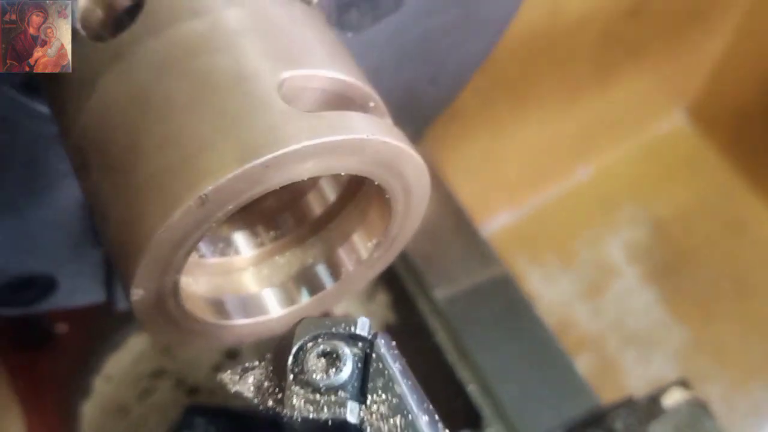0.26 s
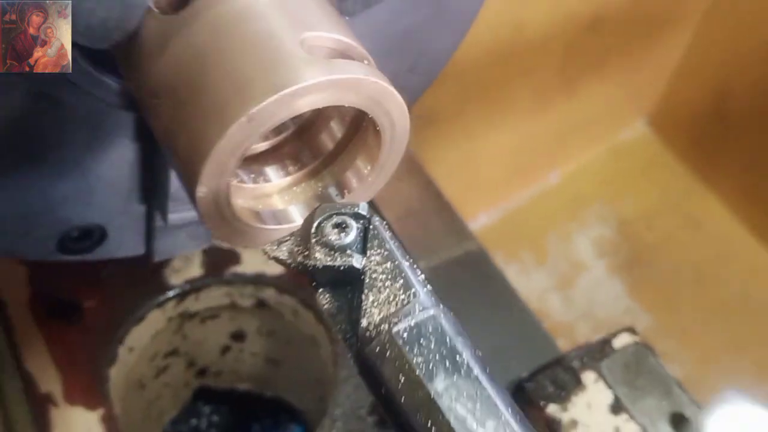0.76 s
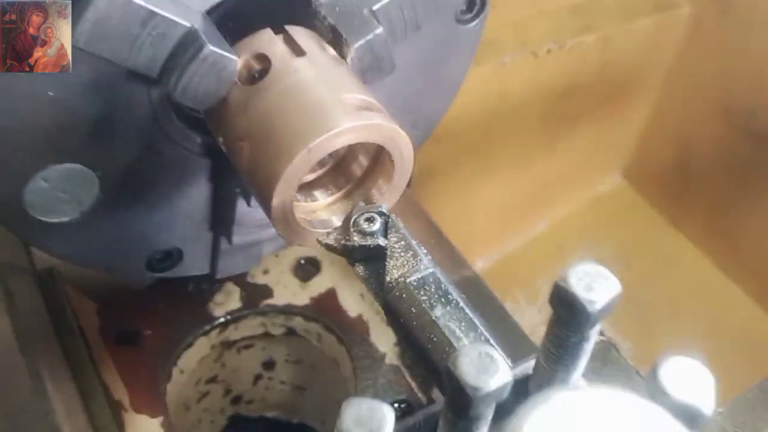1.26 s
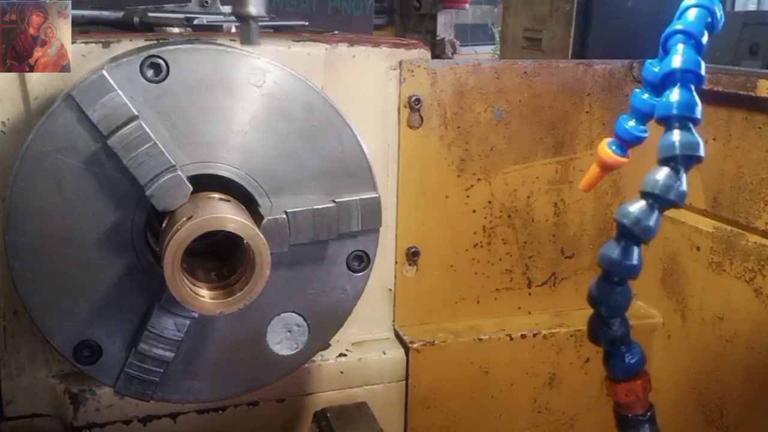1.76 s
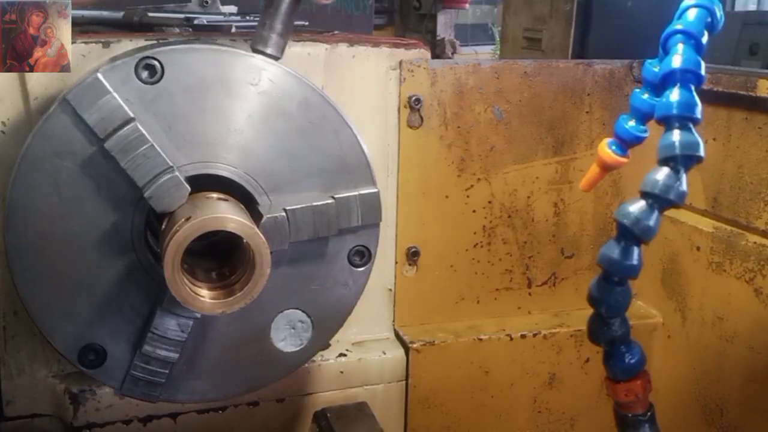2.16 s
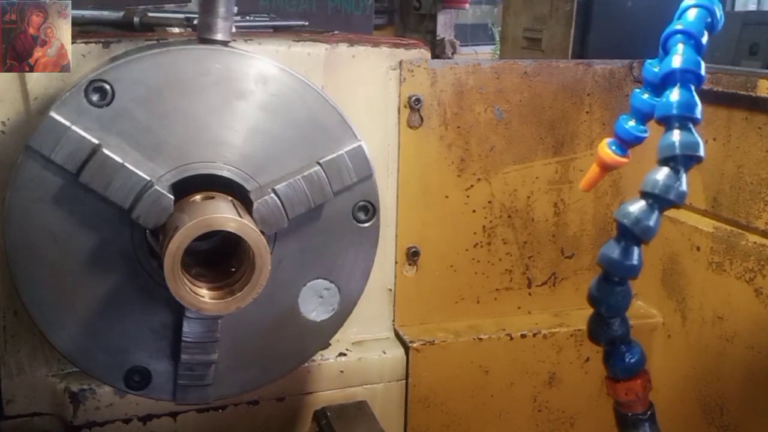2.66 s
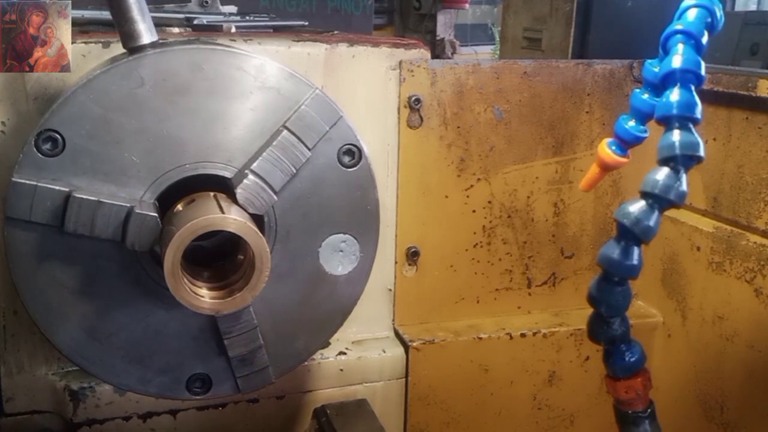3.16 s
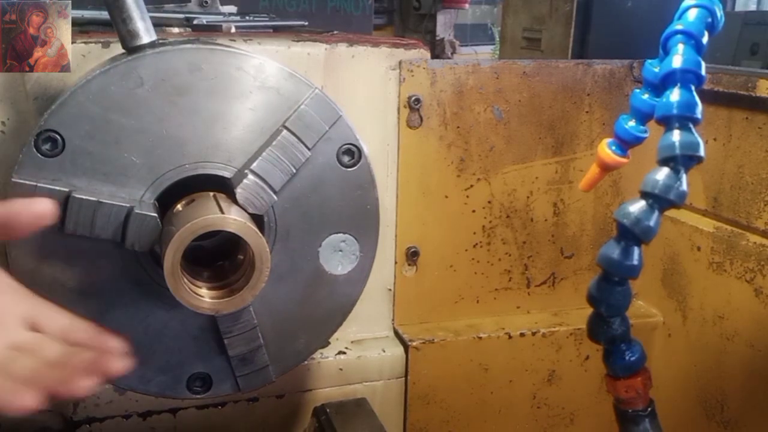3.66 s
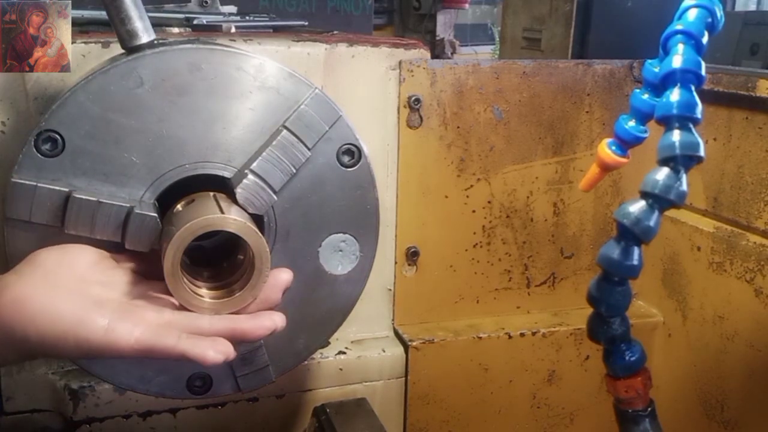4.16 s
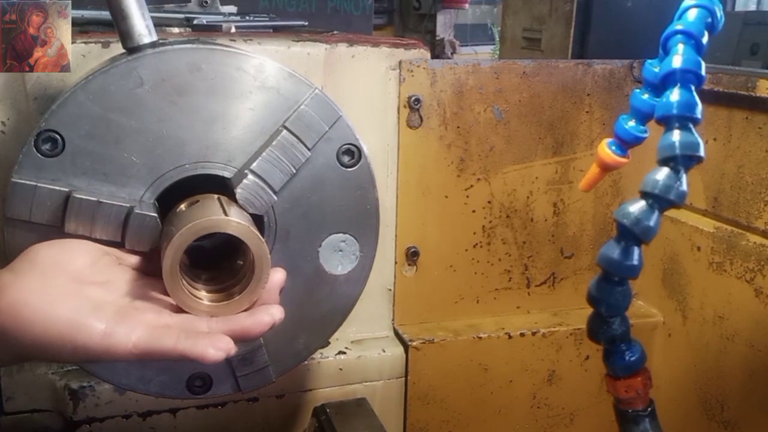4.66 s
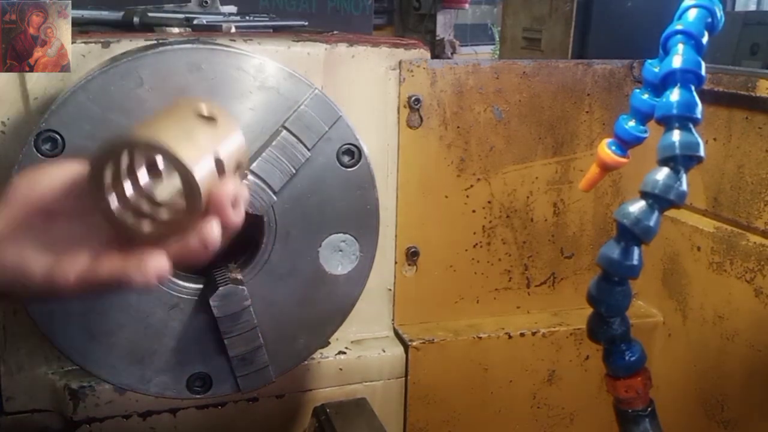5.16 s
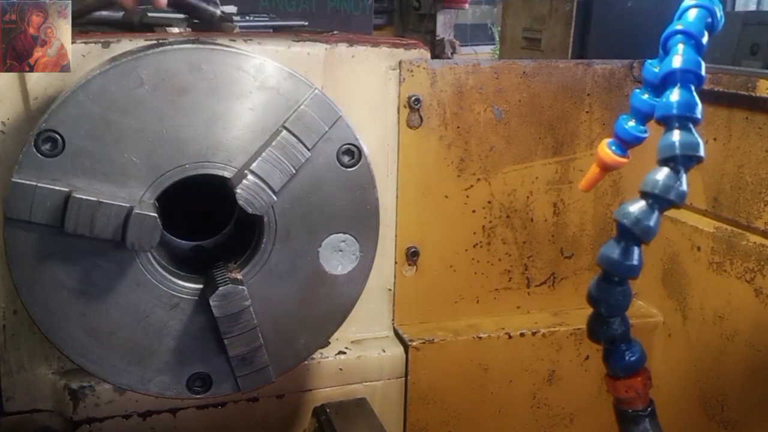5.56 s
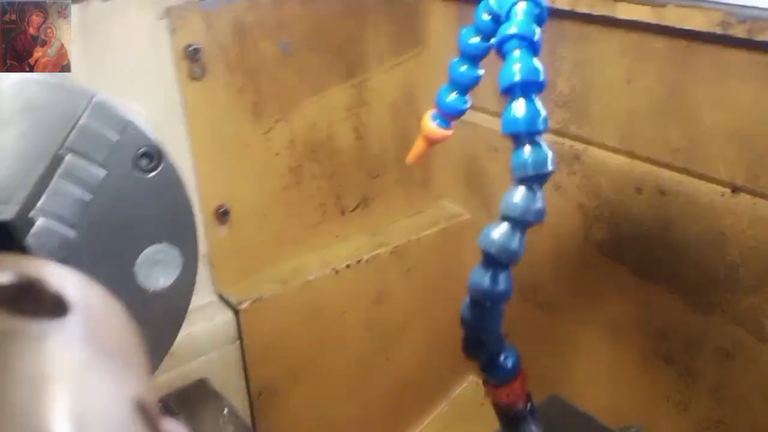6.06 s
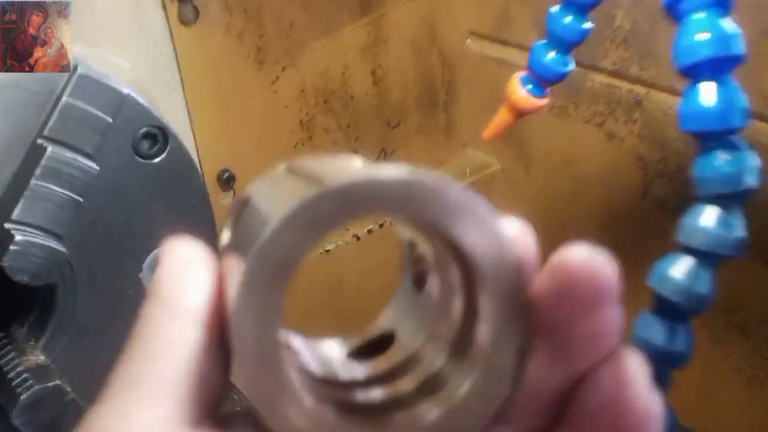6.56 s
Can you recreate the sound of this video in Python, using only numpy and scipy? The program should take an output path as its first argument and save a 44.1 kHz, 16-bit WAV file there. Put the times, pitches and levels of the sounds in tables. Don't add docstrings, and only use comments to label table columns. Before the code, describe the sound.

Sharp steel clicks and a dropped, rattling key in an idle lathe shop, with echoing bird whistles, hissing insects and low far-off rumble.

```python
import sys
import numpy as np
from scipy import signal
from scipy.io import wavfile
from scipy.ndimage import uniform_filter1d

SR = 44100
rng = np.random.default_rng(int(sys.argv[2]) if len(sys.argv) > 2 else 0)


def invert_db(level):
    return 10 ** (np.asarray(level, dtype=float) / 20)


def store_pcm(level_fs):
    pcm = np.round(np.clip(level_fs, -1, 1) * 32767).astype(np.int16)
    wavfile.write(sys.argv[1], SR, np.atleast_2d(pcm).T)


N = 300309


def evened(x):
    return x / np.sqrt(np.mean(x ** 2) + 1e-20)


def read(points, hz):
    f, value = np.transpose(points)
    return np.interp(np.log(hz + 1), np.log(f + 1), value)


def sides(db):
    return invert_db(np.array([[db / 2], [-db / 2]]))


def add(mix, s, sound):
    part = mix[..., round(s * SR):][..., :sound.shape[-1]]
    part += sound[..., :part.shape[-1]]


SPLICES = [
    0,
    1.5,
    3.607,
    5.826,
    7,
]


def by_shot(values, s):
    return np.take(values, np.searchsorted(SPLICES, s + .01) - 1)


def to_shot(s, sound):
    end = SPLICES[np.searchsorted(SPLICES, s + .02)]
    left_s = end - s - np.arange(sound.shape[1]) / SR
    return sound * np.clip(left_s / 0.0035, 0, 1)


# pitch_hz, left_over_right_db
LEAN = [(60, -1.5), (110, 0), (200, 2), (380, -4), (700, 1.5), (1290, 1.5), (2380, 4.5), (4400, 5),
        (8120, -19.5), (15000, 10)]


def noise(shape, size, patchy_db, same):
    frames, hz = 4 * N // size + 5, np.fft.rfftfreq(size, 1 / SR)
    a, b, c, d, patches = rng.standard_normal((frames, len(hz), 5)).T
    patches = uniform_filter1d(patches, size=8, axis=0)
    patches = evened(uniform_filter1d(patches, size=10, axis=1))
    like = np.clip(read(same, hz), -1, 1)[:, None]
    left = a + 1j * b
    right = like * left + np.sqrt(1 - like ** 2) * (c + 1j * d)
    z = np.array([left, right])
    z *= invert_db(read(shape, hz)[:, None] + patchy_db * patches)
    z[0] *= invert_db(read(LEAN, hz))[:, None]
    return evened(signal.istft(z, nperseg=size, noverlap=3 * size // 4)[1][:, :N])


def tail(decays, start_s, hold_s, lumpy_db):
    taps = np.zeros((2, 25000))
    slots = np.arange(round(start_s * SR), taps.shape[1] - 20, 20)
    at = slots + rng.integers(0, 20, (2, len(slots)))
    np.put_along_axis(taps, at, rng.choice([-1., 1.], at.shape), 1)
    lumps = evened(uniform_filter1d(rng.standard_normal(taps.shape[1]), size=250))
    taps *= invert_db(lumpy_db * lumps)
    hz, t, z = signal.stft(taps, SR, nperseg=256)
    fade_db = -60 * np.maximum(t - hold_s, 0) / read(decays, hz)[:, None]
    out = signal.istft(z * invert_db(fade_db), SR, nperseg=256)[1]
    return out / np.linalg.norm(out[0])


def ring(hz, db, t60, apart, rough):
    t = np.arange(int(np.clip(t60.max() * SR, 3000, SR // 2))) / SR
    start, throb, when = rng.random((3, len(hz), 1))
    phase = 2 * np.pi * start + apart * rng.standard_normal((2, len(hz), 1))
    beat = (15 + 50 * throb) * t + when + 0.37 * np.sin(45 * t + 6 * start)
    size = invert_db(db[:, None] - 60 * t / t60[:, None]) * (1 + rough * np.sin(2 * np.pi * beat))
    return (size * np.sin(2 * np.pi * hz[:, None] * t + phase)).sum(1)


def causal(gain_db):
    log_gain = np.log(invert_db(np.maximum(gain_db, -70)))
    full = np.concatenate([log_gain, log_gain[-2:0:-1]])
    taps = np.fft.ifft(np.exp(np.conj(signal.hilbert(full)))).real[:256]
    return taps / np.linalg.norm(taps)


# pitch_hz, level_db per Hz
BUSY = [(150, -4.5), (250, -1), (1240, -9.5), (2300, -7.5), (3500, -17.5), (4850, -5.5), (4980, -19),
        (6700, -10.5), (7840, 8), (9660, -16), (10300, -28.5), (12500, -34), (14700, -33.5), (16000, -51)]
QUIET = [(150, -8.5), (250, -4), (342, -9), (802, -11), (1160, -18), (1420, -15.5), (1980, -19),
         (4490, -22.5), (4990, -23.5), (6250, -22), (7700, 0.5), (9660, -10.5), (10700, -26.5),
         (13700, -25), (16000, -33.5)]
# pitch_hz, likeness (0 to 1)
SAME = [(60, 0.71), (180, 1), (550, 0.27), (1650, 0.01), (4970, 0.01), (15000, 0.01)]
# time_s, level_db
SWELL = [(0, 1.4), (.3, 1.5), (.7, 1), (1.05, 2), (1.25, 2.5), (1.4, 1.5), (1.5, 4)]
# level_db, then left_over_right_db
AIR_BY_SHOT_DB = [-0.17, -1.97, -2.5, 1.5]
LEAN_BY_SHOT_DB = [2.5, -1.3, -1.5, -1.7]


def air():
    t = np.arange(N) / SR
    shot = np.searchsorted(SPLICES, t, "right") - 1
    swell_db = np.interp(t, *np.transpose(SWELL))
    busy = invert_db(-48.5 + swell_db) * noise(BUSY, size=1024, patchy_db=2.5, same=SAME)
    quiet = invert_db(-54.5) * noise(QUIET, size=1024, patchy_db=2.5, same=SAME)
    lean = invert_db(np.take(LEAN_BY_SHOT_DB, shot) * np.array([[.5], [-.5]]))
    return np.where(shot == 0, busy, quiet) * invert_db(np.take(AIR_BY_SHOT_DB, shot)) * lean


# centre_hz, width_hz, pulses_per_s, level_db
INSECTS = (7726, 708, 44.5, -70)


def insects():
    hz, width_hz, rate, db = INSECTS
    drift = evened(uniform_filter1d(rng.standard_normal(N), size=9000))
    pulse_part = np.cumsum(rate * (1 + 0.0092 * drift)) / SR % 1
    gate = np.exp(-pulse_part / 0.92)
    edges_hz = [hz - width_hz / 2, hz + width_hz / 2]
    band = signal.butter(2, edges_hz, "bandpass", fs=SR, output="sos")
    rasp = evened(signal.sosfilt(band, gate * rng.standard_normal(N)))
    return invert_db(db) * sides(-24.5) * rasp


# pitch_hz, level_db per Hz
DEEP = [(30, -17), (46, -17), (59, 20), (76, 29), (102, -31), (140, -62), (240, -120)]
BOOM = [(50, -35), (85, -30), (108, -1.5), (135, 14.5), (199, -9.5), (227, -0.5), (259, -39), (320, -30),
        (420, -60), (700, -120)]
TRAFFIC_DB = [-59.5, -60.5, -67.5, -62]
HANDLING_DB = [-61, -78, -74.5, -50]
# middle_s, level_db, half_width_s
SURGES = [(.16, -52, 0.06), (0.829, -45.5, 0.023), (1.121, -45.5, 0.049), (1.641, -53.5, 0.26),
          (2.2, -58, .1), (3.08, -55, 0.068), (3.301, -57.5, 0.19), (5.1, -62.5, 0.086),
          (6.682, -57.5, 0.16)]
# middle_s, level_db, half_width_s
BUMPS = [(.2, -47.5, 0.13), (.83, -69, 0.064), (1.12, -66, 0.032), (1.458, -41.5, 0.069), (2.08, -42, 0.07),
         (5.56, -49, 0.064), (5.9, -50, 0.19), (6.581, -57, 0.093)]


def rumble():
    t = np.arange(N) / SR
    alike = [(20, 1.0), (300, 0.86)]  # (pitch_hz, likeness)

    def level(steady_db, swells):
        humps = sum(invert_db(db) * np.exp(-((t - s) / half) ** 2) for s, db, half in swells)
        return invert_db(by_shot(steady_db, t)) + humps

    deep = level(TRAFFIC_DB, SURGES) * noise(DEEP, size=2048, patchy_db=4.5, same=alike)
    boom = level(HANDLING_DB, BUMPS) * noise(BOOM, size=2048, patchy_db=2.5, same=alike)
    return deep + boom


# pitch_hz, level_db, loudest_s
WHINE = [(972, -58.5, 0.89), (1927, -56, 0.63), (2286, -63, 0.53), (2484, -69, 0.19), (3400, -61, 0.88),
         (3050, -49, 0.29), (2310, -60, 1), (3730, -55.5, 0.3), (4330, -60.5, 0.8), (4490, -50, 0.86),
         (4650, -55.5, 0.39)]


def motor():
    count = round(SPLICES[1] * SR)
    t, out = np.arange(count) / SR, np.zeros((2, N))
    for hz, db, loudest_s in WHINE:
        a, b = rng.standard_normal((2, 2, count))
        fuzz = evened(uniform_filter1d(a, size=250)) + 1j * evened(uniform_filter1d(b, size=250))
        swell, stray = (evened(uniform_filter1d(v, size=6000)) for v in rng.standard_normal((2, count)))
        turns = np.cumsum(hz * (1 + 0.006 * stray)) / SR
        beat_db = 3.5 * np.cos(2 * np.pi * (t - loudest_s) / 0.86)
        tone = ((0.5 + 0.38 * fuzz) * np.exp(2j * np.pi * turns)).real
        out[:, :count] += invert_db(db + 3 * swell + beat_db) * tone
    out[:, :count] *= invert_db(np.linspace(-7.5, -1, count))
    return out


# pitch_hz, fall_by_60_db_s
YARD = [(700, 0.42), (1500, 0.57), (2200, 1), (4000, 0.63), (7000, 0.91)]


def note(db, from_hz, to_hz, length, pan_db, pace, bend, wobble, hold, wall_db, colour_db):
    sung_s = length * pace
    u = np.arange(round(sung_s * SR)) / (sung_s * SR)
    waver = evened(uniform_filter1d(rng.standard_normal(SR), size=150))[:len(u)]
    glide_hz = from_hz + (to_hz - from_hz) * u ** bend
    hz = glide_hz + wobble * (abs(to_hz - from_hz) + 60) * waver
    tone = np.sin(2 * np.pi * np.cumsum(hz) / SR) * signal.windows.tukey(len(u), .2)
    tone *= invert_db(colour_db * np.sin(2 * np.pi * (1.72 * u + rng.random())))
    echoes = tail(YARD, start_s=0.001974, hold_s=hold * length, lumpy_db=0.5)
    sound = signal.fftconvolve(tone[None], echoes, axes=1)
    flash = tone * np.exp(-((u - .5) * sung_s / 0.0021) ** 2)
    add(sound, .017, invert_db(wall_db) * flash)
    return invert_db(db) * sides(pan_db) * sound


# start_s, level_db, top_hz, length_s
WHISTLES = [(0.249, -37, 1802, 0.14), (0.99, -35.5, 1783, 0.33), (1.898, -40, 1670, 0.036),
            (2.311, -51, 1380, 0.056), (2.541, -50.5, 1430, 0.029), (2.756, -40, 1690, 0.077),
            (2.978, -47, 1415, 0.021), (3.097, -53.5, 1330, 0.013), (3.269, -44, 1390, 0.021),
            (3.505, -50.5, 1395, 0.015), (3.599, -47, 1715, 0.047), (4.014, -55.5, 1600, 0.032),
            (4.057, -36, 1735, 0.07), (4.38, -54, 1610, 0.036), (4.515, -36.5, 1700, 0.0826),
            (4.809, -37.5, 1711, 0.082), (5.055, -36, 1718, 0.077), (5.299, -37, 1740, 0.11),
            (5.816, -49, 1747, 0.054), (6.089, -48.5, 1730, 0.094), (6.499, -55.5, 1720, 0.12)]
WHISTLE_LOW_HZ = [1372, 1344, 1337, 1434]
WHISTLE_PAN_DB = [10, -3.5, -2.5, 12]
# start_s, level_db, from_hz, to_hz
CHIRPS = [(2.308, -57, 4210, 2870), (2.437, -50, 4930, 3420), (3.34, -46.5, 4880, 3400),
          (3.602, -48.5, 4950, 3446), (3.81, -57.5, 4860, 3890), (4.284, -50.5, 5140, 3560),
          (4.868, -52.5, 5300, 3660), (4.951, -47, 5040, 3483), (5.209, -56, 4650, 3217),
          (5.778, -41.5, 4550, 3560)]
# start_s, level_db, from_hz, to_hz, length_s
NOTES = [(0.379, -43, 4340, 4570, 0.074), (0.592, -48, 5200, 5820, 0.07), (0.69, -50, 5100, 5700, 0.096),
         (1.13, -43, 5100, 5600, 0.042), (1.14, -50, 2740, 2130, 0.2), (1.272, -48.5, 900, 1260, 0.095),
         (1.295, -40.5, 5900, 6670, 0.031), (1.503, -39, 7100, 6800, 0.025),
         (2.832, -34, 2360, 2140, 0.024), (2.972, -37.5, 2200, 1910, 0.027),
         (3.057, -65.5, 3030, 2800, 0.092), (4.253, -64.5, 5336, 5490, 0.3),
         (5.84, -51.5, 6500, 5640, 0.046), (6.023, -55, 5510, 6050, 0.054),
         (6.031, -54.5, 3700, 3760, 0.059), (5.985, -61.5, 3900, 4500, 0.075),
         (3.355, -65.5, 4390, 4100, 0.053), (3.369, -55.5, 3900, 3400, 0.041),
         (3.506, -60, 4270, 3800, 0.064), (3.612, -62, 4380, 4300, 0.034),
         (3.638, -60.5, 3600, 3200, 0.046), (3.089, -58, 2250, 2200, 0.1), (3.29, -59.5, 2330, 2080, 0.064),
         (2.65, -61, 2600, 2327, 0.041), (2.989, -55, 2800, 2300, .05), (4, -48.5, 1600, 1500, 0.0186),
         (.37, -48.5, 1480, 1340, .08), (0.13, -55, 2600, 2400, .12), (1.27, -49, 1500, 1400, .08)]
NOTE_PAN_DB = [7.5, 0.94, 6.5, .1]


def birds():
    out = np.zeros((2, N))
    for s, db, top_hz, length in WHISTLES:
        call = db, by_shot(WHISTLE_LOW_HZ, s), top_hz, length, by_shot(WHISTLE_PAN_DB, s)
        pace = min(0.45, 0.0512 / length)
        sound = note(*call, pace=pace, bend=0.743, wobble=0.031, hold=0.81, wall_db=-4.0, colour_db=2.0)
        add(out, s, to_shot(s, sound))
    small = []
    chirp_s, pan_db, bend, colour_db = .02, 4.5, .9, 6.5
    for s, db, from_hz, to_hz in CHIRPS:
        small.append((s, db, from_hz, to_hz, chirp_s, pan_db, bend, colour_db))
        small.append((s - .006, db - 9.5, from_hz * 1.3, from_hz, chirp_s / 3, pan_db, bend, colour_db))
    small += [(*row, by_shot(NOTE_PAN_DB, row[0]), .55, 2.5) for row in NOTES]
    for s, *call, bend, colour_db in small:
        sound = note(*call, pace=0.99, bend=bend, wobble=0.17, hold=0.97, wall_db=-35.0, colour_db=colour_db)
        add(out, s, to_shot(s, sound))
    return out


GRIP_SHARE = 0.26
# start_s, crack_db, contact_s, ring_db, brightness_db per octave
GRIPPED = [(0.473, -56, 0.0019, -75, 7), (1.730, -16, 0.0069, -17, 3), (1.872, -38.5, 0.0067, -51, -8.5),
           (1.881, -32.5, 0.014, -52, -3), (1.893, -31.5, 0.0054, -41, -5.5),
           (1.904, -33.5, 0.0057, -63, -8.5), (2.004, -13, 0.0015, -29, -3), (2.009, -15, 0.0018, -39, 0.5),
           (2.0101, -23.5, 0.0033, -21.5, 1), (2.012, -18.5, 0.0046, -40, -0.5),
           (2.704, -39, 0.002, -87, 10.5), (4.178, -45.5, 0.0044, -47, -6)]
# start_s, crack_db, contact_s, ring_db, share of free ringing length
LOOSE = [(1.51, -49.5, 0.014, -67, 1), (1.746, -27, 0.0066, -65, 0.81), (2.043, -55, 0.0077, -58.5, 0.99),
         (5.461, -29, 0.0025, -35, 0.2), (5.479, -35.5, 0.0084, -59, 0.27), (5.468, -39, 0.051, -35, 0.98),
         (5.499, -36, 0.0058, -25.5, 0.35), (5.503, -27, 0.015, -29, 0.25), (5.516, -49, 0.007, -47, 0.3),
         (5.542, -39.5, 0.027, -34, 0.24), (5.566, -34, 0.004, -22.5, 0.5), (5.572, -31, 0.0022, -26, 0.24),
         (5.581, -28, 0.0057, -16.5, 0.27), (5.594, -31.5, 0.018, -29, 0.65),
         (5.604, -40, 0.0057, -34.5, 0.71), (5.613, -26, 0.0036, -32, 0.54),
         (5.624, -29.5, 0.021, -30.5, 1), (5.645, -38.5, 0.016, -39, 0.91),
         (5.666, -42.5, 0.034, -34, 0.96), (5.707, -45.5, 0.025, -67, 0.63),
         (5.761, -46.5, 0.028, -44, 0.75), (6.119, -55, 0.0042, -62, 0.25)]


def touches():
    held = [(*row[:4], GRIP_SHARE, row[4]) for row in GRIPPED]
    return held + [(*row, 2 - 197 * row[2]) for row in LOOSE]


def tilt(hz, bright_db):
    return bright_db * np.log2(np.maximum(hz, 900) / 5000)


# pitch_hz, level_db per Hz
CRACK = [(290, -10.5), (500, -37.5), (2650, 3.5), (3550, -0.5), (4360, 3), (5590, -7), (6700, 1.5),
         (8800, 4), (10600, -14), (11800, -13), (13300, -17), (14600, -19), (15700, -37)]
RATTLE = [(200, -8), (600, -14.5), (2000, -10.5), (2700, -1), (3500, -11), (4400, -5.5), (5400, -11.5),
          (6500, 0.5), (9500, -9.5), (10800, -12.5), (12000, -2), (13000, -37), (16500, -58)]


def contact_crack(s, length, bright_db):
    hz, t = np.fft.rfftfreq(512, 1 / SR), np.arange(2500) / SR
    a, b = rng.standard_normal((2, len(t)))
    shape = np.exp(-t / length) * np.minimum(t / (0.12 * length), 1)
    burst = np.array([a + 0.96 * b, a - 0.71 * b]) * shape
    colour = causal(read(CRACK if s < 5 else RATTLE, hz) + tilt(hz, bright_db))
    return signal.fftconvolve(burst, colour[None], axes=1)


KEY_HZ = [2640, 2717, 4320, 4376, 6454, 6528, 7015, 8746, 8865, 10330, 11600, 11670, 14549, 14593]
# at_chuck_db, dropped_db, free fall_by_60_db_s
KEY = [(1, -10, 0.098), (-6.5, -14, 0.17), (0, -10.5, 0.12), (2, -6, 0.33), (-3, -3.5, 0.33),
       (-20, 0, 0.18), (10, -10, 0.071), (0, 1.5, 0.33), (-10, -2, 0.36), (-6.5, -9, 0.02), (13, 3, 0.28),
       (-8, -8, 0.22), (-12, -1, 0.17), (-14, -2, 0.18)]
KNOCK_DB = [1, -12, -16, 9, 9.5, -3.5, -3, 6, 9.5, -9, 2, -4, -0.5, -2.5]
TUMBLE_DB = [-12.5, -10, -11, -16, -5, -4, -15.5, 0.5, -6, 18, -7.5, -11, -28, -28]


def key_ring(s, length, share, bright_db, knock):
    held_db, dropped_db, t60 = np.transpose(KEY)
    hz, gripped = np.array(KEY_HZ), share == GRIP_SHARE
    if knock:
        modes_db = np.array(KNOCK_DB)
    elif s < 5:
        modes_db = held_db
    else:
        modes_db = np.array(TUMBLE_DB) if s < 5.55 else dropped_db
    modes_db = modes_db + tilt(hz, bright_db) + 1.45 * rng.standard_normal(len(KEY))
    hz = hz * (1 + 0.0011 * rng.standard_normal(len(KEY)))
    apart, rough = .45 if s < 5 else .9, .3 if gripped else .9
    rings = ring(hz, modes_db, t60 * share, apart=apart, rough=rough)
    t = np.arange(rings.shape[1]) / SR
    rings = rings * (1 - np.exp(-t / (0.34 * length)))
    if gripped:
        rings = rings * invert_db(-24 * np.clip((t - 1.9 * length) / 0.011, 0, 1))
    return rings


# pitch_hz, level_db, fall_by_60_db_s
CHUCK = [(2264, 0.5, 0.02), (3130, -10.5, 0.04), (3610, -10, 0.033), (6020, -14, .07), (7340, -7, 0.024),
         (7370, 0.5, 0.019), (7880, 2.5, 0.028), (9870, -8, .05), (10440, -11.5, 0.071), (12030, 0, 0.04)]
# pitch_hz, fall_by_60_db_s
SHOP = [(100, 1), (500, 0.78), (2000, 0.3), (6000, 0.33), (15000, 0.22)]
KEY_PAN_DB = [
    -2.5,
    -1,
]


def key():
    out, room = np.zeros((2, N)), tail(SHOP, start_s=.003, hold_s=0.0014, lumpy_db=-0.5)
    for s, crack_db, length, ring_db, share, bright_db in touches():
        knock = 1.95 < s < 2.1
        pan = sides(KEY_PAN_DB[int(s > 5)])
        sound = invert_db(ring_db) * key_ring(s, length, share, bright_db, knock)
        unheard = 0.6 * sound[:1] * pan[0]
        add(sound, 0, invert_db(crack_db) * contact_crack(s, length, bright_db))
        if knock:
            body = ring(*np.transpose(CHUCK), apart=1.4, rough=0.33)
            add(sound, 0, invert_db(crack_db - 7) * body[:, :3000])
        sound = sound * pan
        wet = invert_db(-12.0) * signal.fftconvolve(sound[:1] - unheard, room[:, :SR // 2], axes=1)
        add(wet, 0, sound)
        add(out, s, to_shot(s, wet))
    return np.array([np.roll(out[0], 5), out[1]])


# start_s, level_db, centre_hz, spread share, fall_by_60_db_s
THUDS = [(1.5, -45.5, 450, 0.78, 0.14), (1.51, -59, 3500, 0.076, 1), (1.511, -59.5, 1372, 0.37, 0.54),
         (1.735, -59.5, 623, 0.22, 1), (2.009, -40.5, 139.5, 0.042, 0.51),
         (2.008, -34.5, 182.6, 0.17, 0.39), (2.011, -40.5, 264, 0.056, 0.63),
         (2.007, -41.5, 522.6, 0.38, 0.27), (2.88, -57.5, 820.5, 0.077, 1), (3.08, -55, 820, 0.08, 0.78),
         (3.1, -58, 485.5, 0.18, 1), (3.385, -44, 689, 0.11, 0.21), (3.44, -43, 533, 0.12, 0.32),
         (3.444, -50, 884, 0.18, 0.25), (3.40, -62, 2260, 0.13, 0.97), (3.444, -48, 1500, 0.47, 0.083),
         (5.264, -52.5, 244, 0.077, 0.97), (5.27, -58.5, 882, 0.14, 1), (5.339, -54, 491, 0.0876, 1),
         (5.462, -47, 331, 0.54, 0.32), (5.5, -38.5, 480, 0.3, 0.054), (5.565, -27, 430, 0.11, 0.26),
         (5.567, -26, 201, 0.23, 0.11), (5.571, -33.5, 1023, 0.36, 0.16), (5.614, -35, 476.3, 0.21, 0.3),
         (5.615, -39, 223.3, 0.14, 0.31), (5.634, -46, 759, 0.19, 0.08)]


def thuds():
    out = np.zeros((2, N))
    for s, db, hz, spread, t60 in THUDS:
        u = rng.uniform(-0.79, 1, (3, 20))
        tones_hz = hz * np.exp((u[0] + u[1]) * spread)
        fade_s = t60 * (1 + 1.06 * u[2])
        knock = ring(tones_hz, db - 12.0 + 3 * u[1], fade_s, apart=hz / 900, rough=0.65)
        attack = np.minimum(np.arange(knock.shape[1]) / SR / 0.002, 1)
        add(out, s, to_shot(s, knock * attack))
    return out


def scene():
    return air() + insects() + rumble() + motor() + birds() + key() + thuds()


def drop_faint_treble(heard):
    hz, t, z = signal.stft(heard, SR, nperseg=2048, noverlap=1024)
    power = (abs(z[:, :1024]) ** 2).mean(0).reshape(256, 4, -1).mean(1)
    band_db = uniform_filter1d(10 * np.log10(power + 1e-20), size=2, axis=1)
    whim = evened(uniform_filter1d(rng.standard_normal(band_db.shape), size=2, axis=1))
    centre = hz[2:1024:4, None]
    steady = np.diff(band_db[40:140].mean(0), append=-200) < 7
    steady &= np.roll(steady, 1)
    weakest_db = np.percentile(band_db[21:81], 15, axis=0) - 30 * (centre > 7000)
    floor_db = np.maximum(-102, band_db.max(0) - 39)
    limit_db = np.maximum(floor_db, weakest_db) + 4.5 * whim
    limit_db -= 9 * (centre > 11200) * (limit_db < -90)
    limit_db[centre[:, 0] > 15750] = 0
    dropped = (band_db < limit_db) & (centre > 1800) & steady
    z[:, :1024] *= invert_db(-50 * np.repeat(dropped, 4, axis=0))
    return signal.istft(z, SR, nperseg=2048, noverlap=1024)[1][:, :N]


def roll_off(x):
    return signal.sosfilt(signal.butter(12, 16770, fs=SR, output="sos"), x)


def record(dry):
    heard = signal.sosfilt(signal.butter(2, 45, "highpass", fs=SR, output="sos"), dry)
    thinned = drop_faint_treble(heard)
    return roll_off(thinned)


dry = scene()
out = record(dry)
store_pcm(out)
```